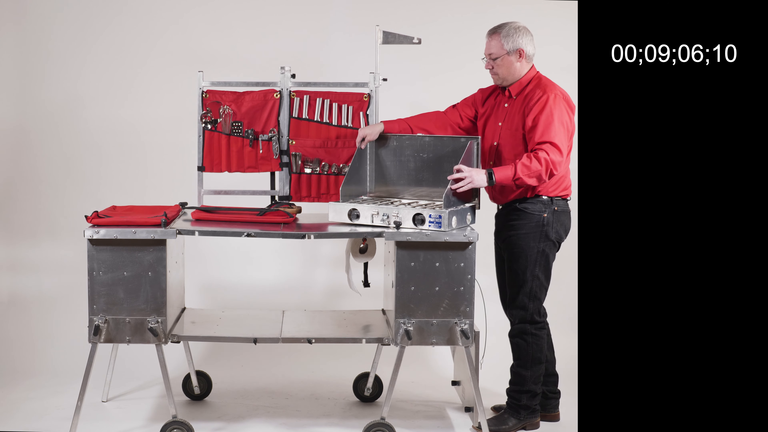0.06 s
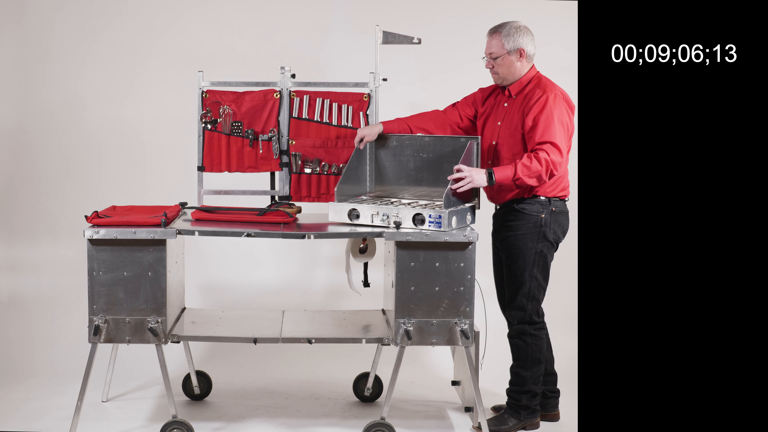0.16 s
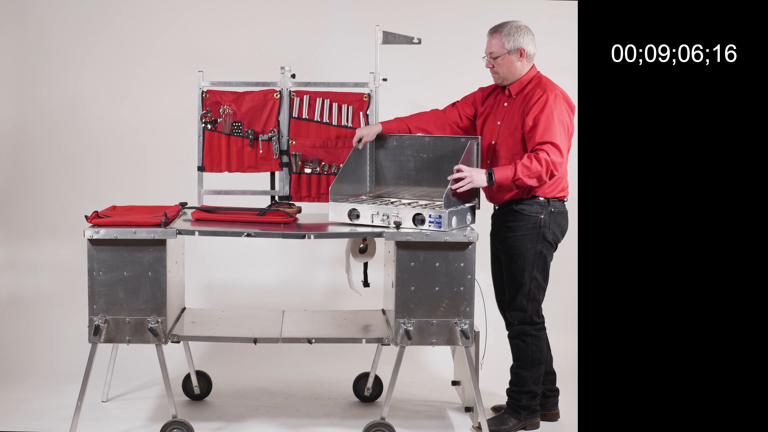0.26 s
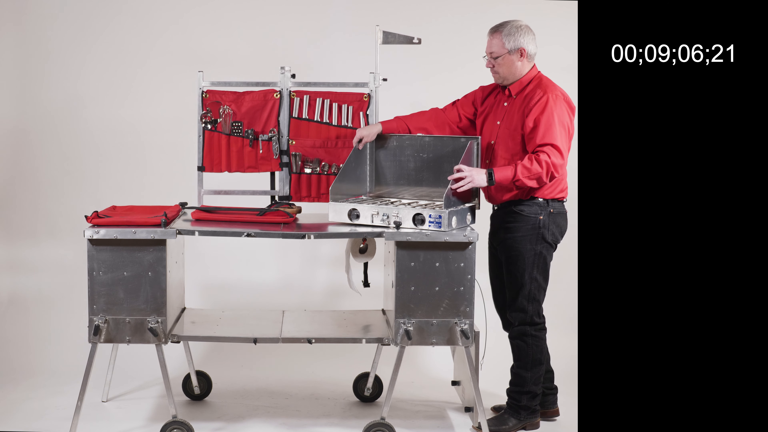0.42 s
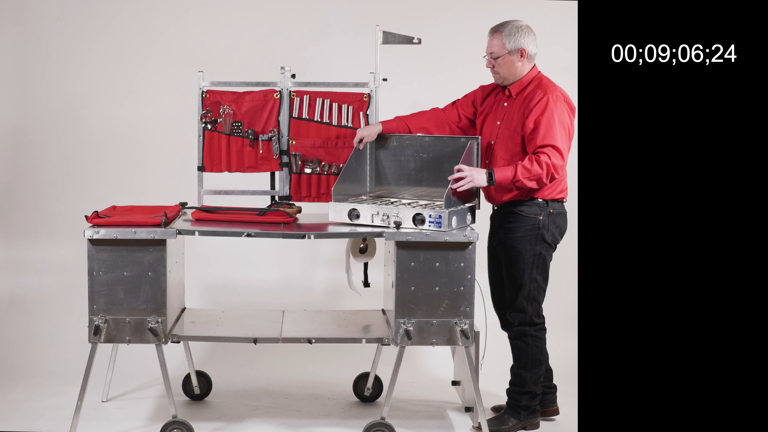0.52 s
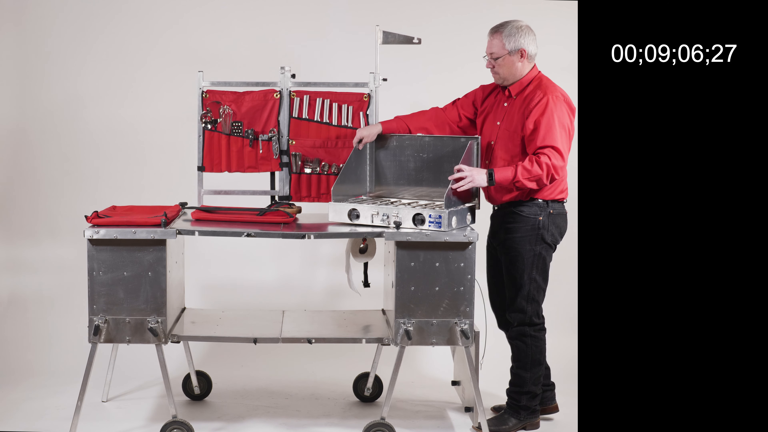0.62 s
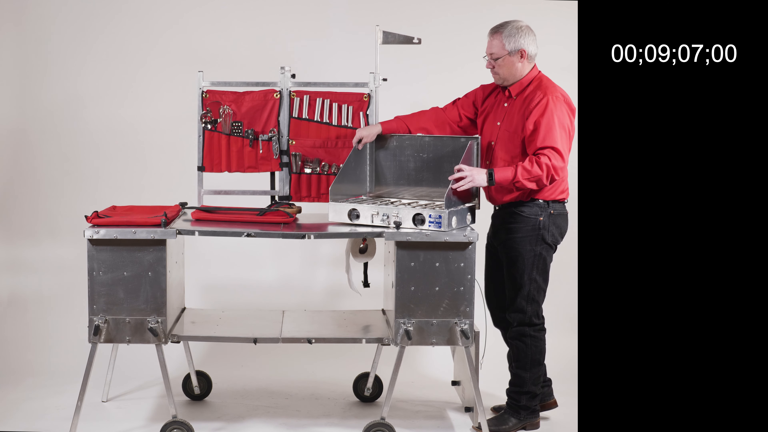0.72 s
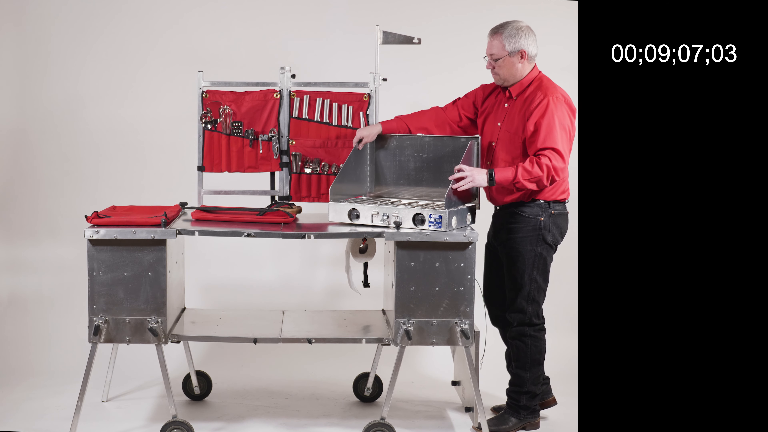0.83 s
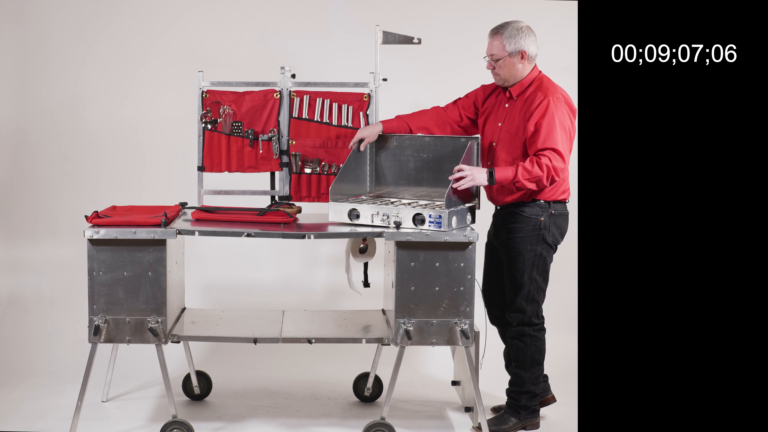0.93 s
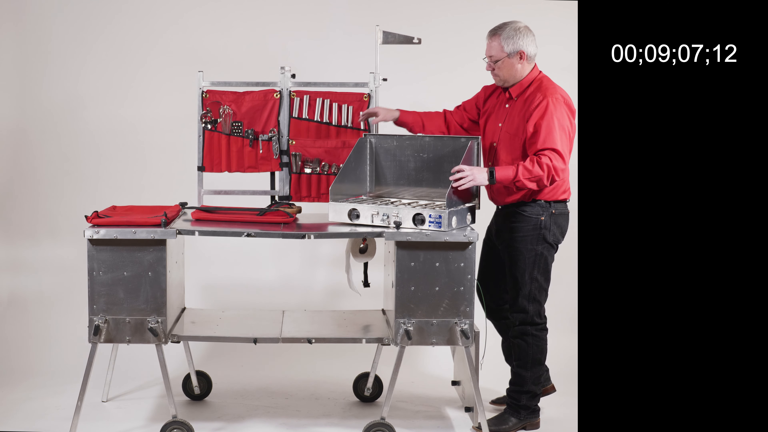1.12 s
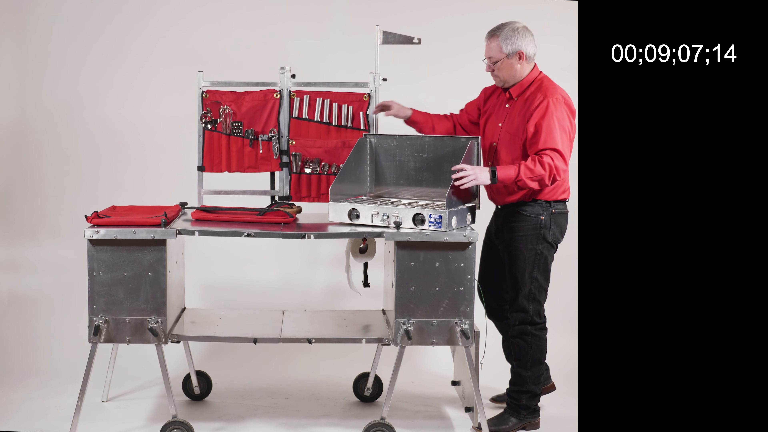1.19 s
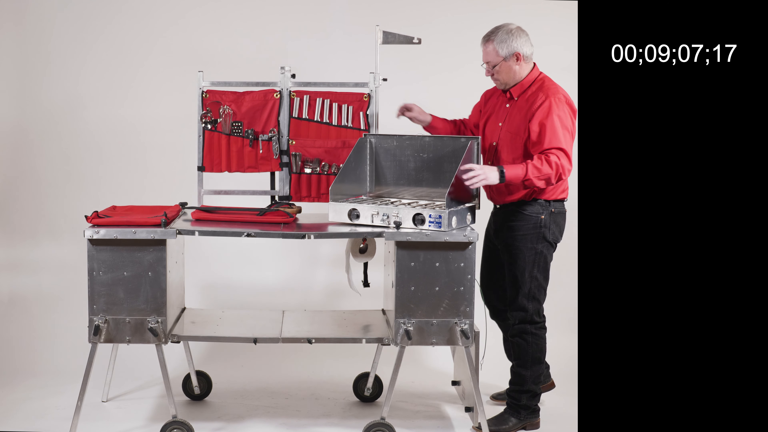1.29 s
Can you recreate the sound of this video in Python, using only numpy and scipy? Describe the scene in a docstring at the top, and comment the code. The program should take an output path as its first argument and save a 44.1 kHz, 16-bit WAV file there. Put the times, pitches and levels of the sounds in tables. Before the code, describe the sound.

Aluminium camp stove panels clank and rattle in a fairly live room. The metal is already ringing at the start, and a small fitting clinks near 0.1 seconds. Knocks with sharp, chattering ticks come from 0.2 to 0.3 seconds, again near 0.6, and around 0.75. From about 1.1 seconds the lid rings on softly. Everything sits on the right, over low room rumble and faint hiss.

```python
"""The aluminium lid and wind panels of a camp stove are swung open and seated in a fairly live room.
The body is still ringing from a bump and a knock as the sound opens. A small fitting clinks, then the
panel edges chatter in flurries of sharp ticks, their treble outrunning the bass through the sheet,
while heavier knocks make the sheets clank and ring. Last, the hand lets go and the lid sings on softly.
All this is on the right, over low room rumble; the left holds hiss and a trace of crosstalk."""
import sys
import numpy as np
from scipy import signal
from scipy.fft import rfft, irfft
from scipy.io import wavfile

SR = 44100
rng = np.random.default_rng(int(sys.argv[2]) if len(sys.argv) > 2 else 0)


def master(y):
    """Save y as 16-bit WAV."""
    cut = np.clip(np.atleast_2d(y).T, -1, 1)
    pcm = np.round(cut * 32767)  # scale
    wavfile.write(sys.argv[1], SR, pcm.astype(np.int16))


N = 59535
SIZE = 131072  # FFT length: the layers are built as spectra
T, F = np.arange(SIZE) / SR, np.arange(SIZE // 2 + 1) * SR / SIZE + 1e-3
LEAD_S = .1  # pre-roll for blows that land before time zero

# knocks on the sheets: t/s, thud/dB, clank/dB, clatter/dB, lid ring/dB, wind panel ring/dB
KNOCKS = [(-.04, -11.5, -9.5, -6.5, -28, -45), (0.1326, -11.5, -13.5, -5, -9.5, -18),
          (0.2306, 5.5, 1, 1.5, -7.5, -4), (.268, 2.5, -3.5, -4.5, -27, -18), (.286, 1, 3, 0, 5.5, -30),
          (.3110, -4.5, 1.5, -5, -10, -13), (0.567, -17, -9, -22, -31, -6), (.585, -3, -1, -6.5, -30, 4),
          (.597, -6.5, -3, -6.5, -28, -14), (.7350, -5.5, 0, -7, -4, -29), (0.7625, 1, 2, -1, 2, -15.5),
          (1.078, -22, -40, -29, -31, -38.5)]


def undb(db):
    """Decibels to gain."""
    return 10 ** (np.asarray(db) / 20)


def along(points, hz):
    """Read a curve of (f/Hz, value) points on a log-frequency axis."""
    p = np.array(points)
    return np.interp(np.log(hz), np.log(p[:, 0]), p[:, 1])


def colour(points):
    """Minimum-phase EQ through (f/Hz, level/dB) points."""
    cepstrum = irfft(np.log(undb(along(points, F))))
    return np.exp(rfft(cepstrum * (1 + np.sign(np.fft.fftfreq(SIZE)))))


def blow(start_s, db):
    """Spectrum of a single impulse."""
    impulse = np.zeros(SIZE)
    impulse[int((start_s + LEAD_S) * SR)] = undb(db)
    return rfft(impulse)


def modes(table, rise_s=0.017):
    """Spectrum of decaying sine modes, their attack softened over rise_s."""
    t = T[:N]
    ring = sum(undb(db - 60 * t / t60) * np.sin(2 * np.pi * hz * t) for hz, db, t60 in table)
    return rfft(ring * (1 - np.exp(-t / rise_s)), SIZE)


def dense_ring(t60_at, rise_at):
    """Countless overlapping modes: half-octave noise bands, each with its own attack and decay."""
    t, octave = T[:SIZE // 4], np.log2(F[::4])
    noise, wash = rfft(rng.standard_normal(len(t))), 0
    for hz in 45 * 2 ** np.arange(0, 9, .5):
        share = np.maximum(1 - 2 * np.abs(octave - np.log2(hz)), 0)
        attack = 1 - np.exp(-np.minimum(t / rise_at(hz), 10) ** 2)
        band = irfft(noise * share) * undb(-60 * t / t60_at(hz)) * attack
        wash = wash + band * np.sqrt(share.mean() / np.sum(band ** 2))  # even energy per hertz
    return rfft(wash, SIZE)


def body_ring():
    """The stove body rings on from a bump just before the opening."""
    # modes of the body: f/Hz, level/dB, t60/s
    body_modes = [(324, 4, 0.4), (544, -22.5, 1), (700, -6, 0.57), (907, -7, 0.61), (1130, 3, 0.42),
                  (1165, 1, .45), (1520, -1, 0.54), (1444, -3.5, .5), (2080, -30, 0.24)]
    return blow(start_s=-0.046, db=-45) * modes(body_modes)


def crossing_time(hz):
    """Seconds a bending wave takes to cross the sheet: the higher, the faster."""
    return 0.0034 * np.sqrt(1000 / hz)


def knocks():
    """Each knock stirs the sheets' dense modes at a new spot, with its own thud, clank and clatter."""
    # tone of a knock: f/Hz, level/dB
    knock_eq = [(40, -49), (75, -11), (110, -7.5), (180, 0), (260, 0), (330, 3.5), (500, 6.5), (700, 1.5),
                (950, 2.5), (1350, 2.5), (1600, 1), (2000, 1.5), (3000, -10.5), (5000, -15), (8000, -20),
                (14000, -41)]
    track = np.zeros(SIZE)
    for start, thud, clank, clatter, _, _ in KNOCKS:
        response = dense_ring(t60_at=lambda hz: 0.12, rise_at=crossing_time) + undb(1.5) * room()
        balance = colour([(300, thud), (900, clank), (1300, clank), (2100, clatter)])
        track += np.roll(irfft(balance * response), int((start + LEAD_S) * SR))
    return undb(5) * rfft(track) * colour(knock_eq)


def room():
    """Reflections merge into a diffuse tail that dies soonest at the very top."""
    # reverb time of the room: f/Hz, t60/s
    decay_times = [(100, 0.56), (300, 0.76), (1000, 0.73), (2500, 0.86), (5000, 0.68), (8000, 0.55),
                   (14000, .25)]
    return dense_ring(t60_at=lambda hz: along(decay_times, hz), rise_at=lambda hz: 0.015)


def sheet_formants():
    """The sheets' resonances stamp the same peaks and valleys on every knock and tick."""
    # resonances of the sheets: f/Hz, width/Hz, lift/dB
    peaks = [(194, 43, 6.5), (333, 24.6, 11), (444, 39, 5), (520.4, 33, 8.5), (641, 6.7, 6.5), (766, 45, 3),
             (900, 103, 7.5), (1034, 52, 4.5), (1143, 60, 3.5), (1264, 51, 4), (1381, 58, 6),
             (1853, 225, 4), (2723, 470, 4.5), (3023, 126, 6.5), (3300, 74, 8), (3674, 106, 4),
             (4330, 115, 6.5), (4900, 110, 1.5), (5080, 290, 4.5), (5870, 164, 8), (6730, 430, 6.5),
             (7730, 280, 2.5)]
    hz, valley_db = np.geomspace(20, SR / 2, 1500), -4.5
    lift_db = sum(lift / (1 + (2 * (hz - centre) / width) ** 2) for centre, width, lift in peaks)
    return colour(np.column_stack([hz, valley_db + lift_db]))


def lid_and_panel_ring():
    """The low modes of lid and wind panel swell after each knock and hang on as a pitched ring."""
    # modes of the lid: f/Hz, level/dB, t60/s
    lid_modes = [(144.7, -11, 0.9), (179, -15, 0.63), (202.9, 0.5, 0.37), (334, -10.5, 0.75),
                 (435, -3.5, 0.4), (524, -2, 0.69), (643, -0.5, 0.78), (736, 0, 0.65), (778, 0, 0.79),
                 (850, 1.5, 0.54), (895, -8, 0.21), (943, -2.5, 0.41), (1052, -7, 0.33), (1366, -18, 0.31),
                 (1402, -8, 0.32)]
    # modes of the wind panel: f/Hz, level/dB, t60/s
    panel_modes = [(207.2, -5.5, 0.68), (224, -4, 0.78), (341, 2, 0.47), (457.2, 12.5, 0.22),
                   (473.4, 10.5, 0.42), (533, -12, 0.56), (689, 5, .4), (923, 8, 0.22), (931, -2, 0.2),
                   (1067, -9, 1), (1217, 5.5, 0.25), (1192, -0.5, 0.74), (1372, 10, 0.19), (1715, -1, 0.32)]
    lid_hits = sum(blow(start, db) for start, *_, db, _ in KNOCKS)
    panel_hits = sum(blow(start, db) for start, *_, db in KNOCKS)
    return undb(-42) * (lid_hits * modes(lid_modes) + panel_hits * modes(panel_modes))


def room_tone():
    """A steady bed of low room rumble under faint, even hiss."""
    # noise spectrum of the bed: f/Hz, level/dB
    bed_eq = [(25, -9), (60, -13.5), (120, 0), (190, 3), (300, -9.5), (600, -8), (1200, -30), (3000, -27.5),
              (8000, -29.5), (15000, -30.5)]
    bed = irfft(rfft(rng.standard_normal(SIZE)) * undb(along(bed_eq, F)))[:N]
    return undb(-62.5) * bed / bed.std()


def fitting_clink():
    """A small fitting is struck once and rings with a quick attack."""
    # modes of the fitting: f/Hz, level/dB, t60/s
    fitting_modes = [(1163, -6, 0.85), (1460, 2, 0.19), (1627, 1, 0.45), (1710, 4.5, 0.2), (1804, 0, 0.24),
                     (1975, -6, 0.17), (2820, -7, 0.2), (2859, 3.5, 0.16), (2850, -20, 0.19),
                     (4040, -2, 0.08)]
    return blow(start_s=.1345, db=-45.5) * modes(fitting_modes, rise_s=0.0018)


def dispersion():
    """All-pass that holds back the low bending waves, turning a click into a short falling chirp."""
    travel_at_1khz_s, first_hz = 0.0027, 8770  # first_hz lands right on the contact time
    lag_cycles = travel_at_1khz_s * (2 * np.sqrt(1000 * F) - F * np.sqrt(1000 / first_hz))
    return np.exp(-2j * np.pi * lag_cycles)


def edge_ticks():
    """Each edge contact fires a sharp chirp, a smear of scattered bending waves and a short bright ring."""
    # edge contacts: t/s, level/dB, sharpness/dB (extra gain on the chirp alone)
    contacts = [(.1345, -18.5, -5), (.2332, -16, 1), (.2565, -20.5, -1), (.2677, -8, 0), (.2741, -2, 2),
                (.2885, -13.5, 1), (.2957, -10, 1.5), (.3012, -7.5, -1), (.3163, -6, -4), (.3232, -13, 2),
                (.3288, -17.5, 2), (.5247, -20.5, 1), (.5878, -14.5, 2), (.5967, -18, -3.5),
                (.7105, -27, -7), (.7335, -21, -5), (.7370, -14.5, 2), (.7448, -4.5, -1), (.7636, -2.5, 3)]
    # tone of the chirp: f/Hz, level/dB
    chirp_eq = [(200, -14.5), (900, -13.5), (2500, -8), (4500, 4), (6000, -4.5), (7000, 6), (7900, 5),
                (8700, -4), (10000, -7.5), (12000, -20), (16000, -25)]
    # tone of the waves scattered through the sheet: f/Hz, level/dB
    scatter_eq = [(150, -21.5), (500, 14.5), (1200, 5.5), (2300, 2.5), (3500, 4), (6000, -1.5),
                  (7700, -0.5), (9000, -6.5), (11500, -13), (16000, -33.5)]
    # treble modes of the struck edge: f/Hz, level/dB, t60/s
    edge_modes = [(2860, 1.5, 0.14), (3430, -1, 0.064), (3600, -2, 0.13), (4110, -4, 0.032),
                  (5190, 11, .04), (5740, -18, 0.026), (6690, -7, 0.035), (7750, 2.5, 0.071)]
    chirp = undb(3) * colour(chirp_eq) * dispersion()
    scatter = dense_ring(t60_at=lambda hz: 0.039 * np.sqrt(4000 / hz), rise_at=crossing_time)
    smear = undb(2.5) * colour(scatter_eq) * (scatter + undb(-11) * room())
    tail = smear + undb(-42) * modes(edge_modes, rise_s=0.00055)
    # light contacts are duller: extra dB of top lost for each dB a contact is weaker
    softening = np.interp(F, [8000, 11000], [0, 0.59])
    return sum(blow(start, db) * undb(softening * db) * (undb(sharpness) * chirp + tail)
               for start, db, sharpness in contacts)


def lid_release():
    """The hand lets go and two lid modes sing on."""
    # modes of the freed lid: f/Hz, level/dB, t60/s
    freed_modes = [(454, -6, 1.6), (530, -1, 1.5)]
    return blow(start_s=1.078, db=-53.5) * modes(freed_modes)


def scene():
    """One microphone on stove and room feeds the right; the left gets hiss and a trace of crosstalk."""
    impacts = (edge_ticks() + knocks()) * sheet_formants()
    rings = body_ring() + lid_and_panel_ring() + fitting_clink() + lid_release()
    start = int(LEAD_S * SR)
    right = irfft(impacts + rings)[start:start + N] + room_tone()
    left = undb(-63) * right + undb(-72) * rng.standard_normal(N)
    return np.array([left, right])


def record(dry):
    """A steep low-pass shaves off the air above 15.8 kHz."""
    return signal.sosfilt(signal.ellip(10, .2, 70, 15800, fs=SR, output="sos"), dry)


dry = scene()
out = record(dry)
master(out)
```